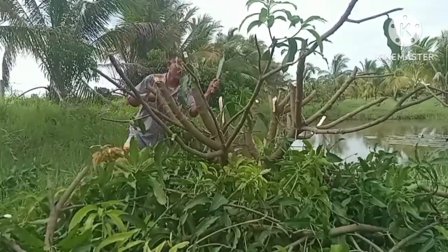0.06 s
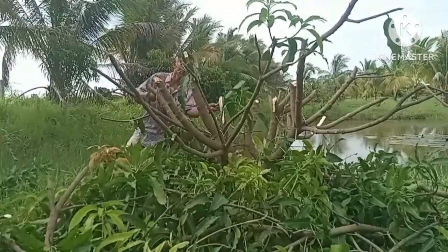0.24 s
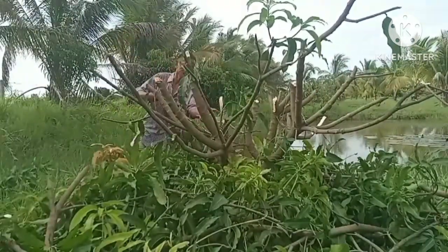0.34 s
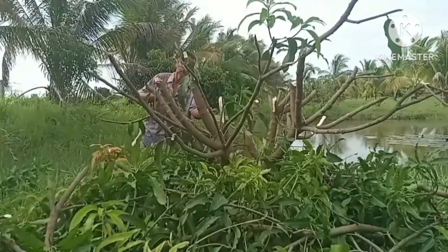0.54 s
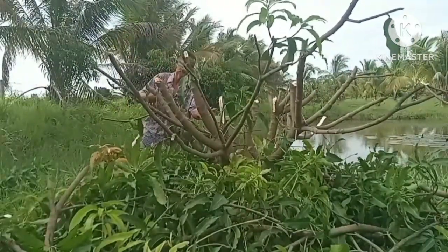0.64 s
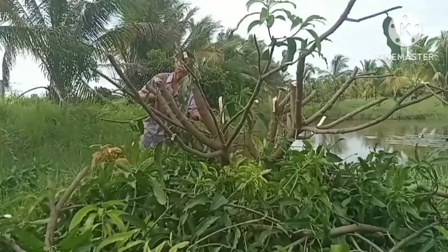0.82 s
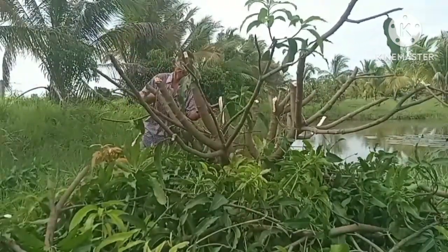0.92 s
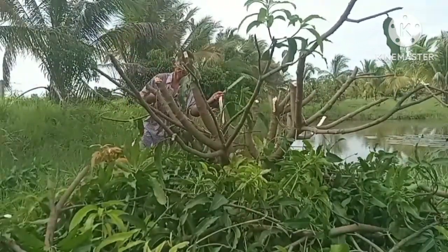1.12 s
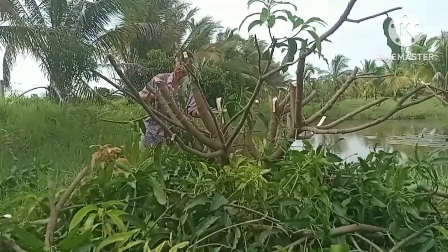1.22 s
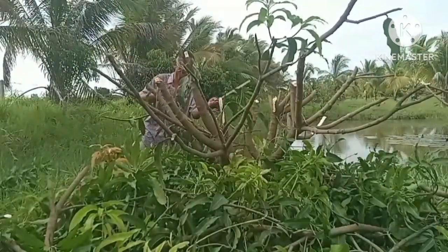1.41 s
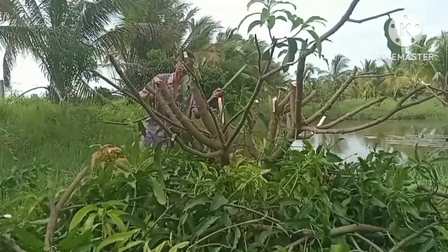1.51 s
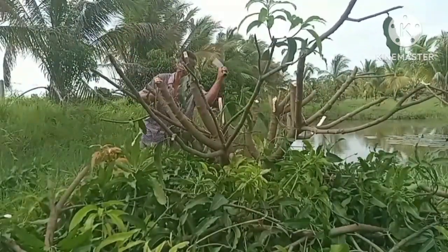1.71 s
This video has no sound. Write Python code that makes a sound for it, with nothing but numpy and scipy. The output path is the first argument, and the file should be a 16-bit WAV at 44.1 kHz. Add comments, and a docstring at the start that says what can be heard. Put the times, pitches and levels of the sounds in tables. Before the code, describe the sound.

A machete chops twice into leafy tree branches, with twigs snapping and leaves rustling outdoors

```python
"""A machete cuts twice into the branches of a leafy tree, a few metres away in an open field.
Each bite is a burst of random fibre fractures, with damped wood modes, hollow thuds and a low shudder.
Leaves rip and twigs snap as filtered clicks; foliage rustles as dense clicks; knocking sticks ring in modes.
Filtered noise gives a faint hiss and rumble, and a noise-driven resonance gives a far-off tone."""
import sys
import numpy as np
from scipy import signal
from scipy.fft import rfft, irfft, next_fast_len
from scipy.io import wavfile

SR = 44100
rng = np.random.default_rng(int(sys.argv[2]) if len(sys.argv) > 2 else 0)


def dump(signal):
    """Clip the signal to [-1, 1] and save it as 16-bit WAV at the path in sys.argv[1]."""
    limited = np.clip(np.atleast_2d(signal).T, -1, 1)
    pcm = np.round(limited * 32767).astype(np.int16)
    wavfile.write(sys.argv[1], SR, pcm)


N = 77175
T = np.arange(N) / SR   # time in s

# blade bites: start_s, level_db, splitting_s (hold before release)
CHOPS = [(0.2668, -15, .0068), (1.2297, -12, .0062)]
# spectrum of the splitting fibres, one list for each cut: frequency_hz, level_db
CUT_COLOURS = [
    [(30, -7), (110, 2.5), (260, -1), (450, 0.5), (680, -5), (850, -5), (1060, -2), (1400, -7), (2200, -6),
     (4000, -4), (7200, 2.5), (8600, -13.5), (11000, -13), (14500, -27), (16000, -45)],
    [(30, -40), (120, -15.5), (350, -2), (550, 3.5), (760, -1), (1100, -10), (1400, -7), (1900, -2),
     (2400, -8), (3300, -6.5), (4400, -8.5), (6500, -5.5), (7600, -5.5), (9000, -20.5), (14500, -26),
     (16000, -38)],
]
SPLIT_RELEASE_S, FIBRES_PER_S = 0.0024, 3200
# modes of each struck branch: pitch_hz, level_db (relative to its bite and WOOD_DB), t60_s
BRANCH_MODES = [
    [(1052, -9.5, 0.025), (1800, -11.5, 0.045), (2230, -5, 0.023), (2740, -14, 0.053), (3354, -11, 0.035),
     (3850, -12.5, 0.032), (4100, -20, 0.04), (5660, -29, 0.037)],
    [(923, -17.5, 0.063), (1102, -27.5, 0.12), (1630, -26, 0.049), (1980, -22, 0.077), (2840, -27, 0.04),
     (3340, -5, 0.02), (6260, -7, 0.019), (6560, -6.5, 0.022)],
]
WOOD_DB = 9
# hollow knocks as the branch takes the blade and springs back: start_s, pitch_hz, level_db, t60_s
THUDS = [(0.2690, 228, -13, 0.021), (0.2778, 256, -10, 0.018), (1.23, 308, -13, 0.022),
         (1.237, 383, -4, 0.027), (1.2510, 322, -24.5, 0.073)]
THUD_RISE_S = 0.0026
# tremble of the tree after each cut: level_db, hold_s, decay_s, spectrum (frequency_hz, level_db)
SHUDDERS = [(-35.5, 0.028, 0.051, [(35, -35), (75, -6.5), (100, 1), (130, -3.5), (190, -4), (300, -10.5),
            (600, -14), (2000, -67)]), (-36.5, 0.052, 0.021, [(35, -22), (75, -7), (105, 4), (180, -12.5),
            (300, 1.5), (420, 3.5), (600, -10), (2000, -81)])]

# leaves torn or swept aside: start_s, level_db, hold_s, treble_tilt_db_per_octave
SWIPES = [(0.2291, -24, 0.0029, 3), (0.237, -15.5, 0.02, 2.5), (0.281, -30, 0.0057, 23),
          (0.336, -26.5, 0.012, 10), (0.354, -21.5, 0.013, -1.5), (0.397, -31.5, 0.0082, -3),
          (0.945, -36.5, 0.025, 1), (1.182, -25, 0.013, 0), (1.323, -31.5, 0.012, -9),
          (1.422, -26.5, 0.0075, 5)]
# spectrum of tearing leaves before the tilt: frequency_hz, level_db
SWIPE_COLOUR = [(40, -50), (290, -5), (520, -14), (950, -13.5), (1300, -6.5), (2200, -6), (3200, -8.5),
                (4800, -12), (6700, 1.5), (7800, -12.5), (8800, -17.5), (11000, -23), (14400, -34),
                (16000, -64)]
TEARS_PER_S, SWIPE_RELEASE_S = 4500, 0.0049
# twigs snapping: start_s, level_db, treble_tilt_db_per_octave
SNAPS = [(0.239, -22.5, 5), (0.256, -17, 2), (0.3378, -26, -3), (0.4425, -24, 12), (0.465, -28, -4),
         (0.4945, -32, -1.5), (0.5095, -31, 1.5), (0.6452, -36, 4), (.677, -36.5, 11), (0.6912, -31.5, 33),
         (0.7305, -36, 10), (0.9571, -31.5, -3.5), (1.028, -47, 5), (1.0856, -34, 7.5), (1.1698, -20.5, 3),
         (1.3972, -22.5, 2.5), (1.4142, -18, -4), (1.4282, -18, -3.5), (1.5886, -23.5, 6.5)]
# spectrum of a snap before the tilt: frequency_hz, level_db
SNAP_COLOUR = [(40, -65), (330, -4), (560, -8), (1100, -8), (2000, -0.5), (3000, 0), (4200, 1),
               (5400, -6.5), (6600, 9), (7800, -15), (9000, -26.5), (11000, -31), (14200, -39),
               (16000, -50)]
SNAP_HOLD_S, SNAP_RELEASE_S, SPLINTERS_PER_S = 0.00023, 0.0046, 4500
FIRST_CRACK_DB = 17.5   # gain of the opening click
# swaying sticks knocking together: start_s, level_db, pitch_ratio
KNOCKS = [(1.3215, -24.5, 1.03), (1.4288, -31.5, 0.66), (1.53, -45, 1.6), (1.542, -43, 1.15),
          (1.599, -50, 0.87), (1.617, -41.5, 0.97), (1.627, -39, 1.02), (1.68, -37.5, 0.93)]
# modes of such a stick: pitch_hz (before the ratio), level_db, t60_s
STICK_MODES = [(1063, -14, 0.04), (1813, 2, 0.03), (2280, -11, 0.021), (3296, -4.5, 0.045),
               (3600, -12, 0.024)]
CHATTER_DB, CHATTER_DECAY_S, CHATTER_TOUCHES_PER_S = -3.5, 0.0067, 3100

# level curves of the shaking foliage, at the start and around each cut: time_s, level_db
SHAKES = [
    [(0, -47), (.03, -49.5), (.1, -61)],
    [(.23, -31), (.29, -32.5), (.33, -28), (.38, -29.5), (.42, -32.5), (.48, -38.5), (.55, -35),
     (.59, -47.5), (.66, -45.5), (.745, -42), (.8, -51.5), (.865, -50.5), (.9, -53)],
    [(1.225, -75), (1.24, -38), (1.28, -33.5), (1.38, -35.5), (1.45, -38.5), (1.51, -45.5), (1.61, -43),
     (1.69, -48), (1.75, -62)],
]
# one tilt for each shake: treble_tilt_db_per_octave
SHAKE_TILTS = [-6, -0.5, -1]
# spectrum of leaf touches before the tilt: frequency_hz, level_db
LEAF_COLOUR = [(120, -23.5), (220, -15.5), (400, -14), (540, -12), (1050, -7.5), (1400, -6.5), (1900, -4),
               (3200, -1), (4700, -6), (6700, 0), (7600, -8), (8600, -17.5), (11500, -28), (14200, -36),
               (16000, -34)]
LEAF_TOUCHES_PER_S, LEAF_SPREAD_DB, LEAF_DIFFUSE_DB = 2000, 3, 4.5
# centres of the bands that swell and fade separately: frequency_hz
PATCH_BANDS = [700, 1100, 1600, 2300, 3300, 4700, 6500]
PATCH_SWELL_DB, PATCH_STEP_S = 5.5, 0.016
TILT_FROM_HZ, TILT_TO_HZ = 1900, 7400   # a treble tilt acts between these and is level beyond

# spectrum of the field hiss: frequency_hz, level_db
AIR_COLOUR = [(100, -4), (250, -13.5), (400, -11), (600, -12), (1400, -9), (2500, -8), (4200, -14),
              (5300, -14.5), (6400, -4), (7300, -11), (8200, -30), (10500, -28), (11700, -19), (12700, -38),
              (14300, -30), (15500, -58)]
AIR_DB, AIR_RIGHT_DB = -51, -5
# spectrum of the moving-air rumble: frequency_hz, level_db
RUMBLE_COLOUR = [(20, -11), (45, 2), (70, 7.5), (105, 6), (150, -6.5), (300, -40), (1000, -52)]
# level curve of the rumble: time_s, level_db
RUMBLE_LEVEL = [(0, -66), (.1, -53.5), (.2, -51), (.38, -54), (.5, -68), (.575, -48.5), (.635, -56.5),
                (.7, -48.5), (.785, -56), (.85, -48), (.9, -58.5), (1.4, -61), (1.75, -61)]
# level curve of the far-off tone: time_s, level_db
FAR_TONE_LEVEL = [(0, -85), (.6, -75), (.655, -60), (.735, -49.5), (.8, -58.5), (.84, -74), (1.06, -67),
                  (1.75, -63)]
FAR_TONE_HZ, FAR_TONE_T60_S = 423, 0.51

# the left microphone hears later, the right one softer
LEFT_LAG_S, RIGHT_DB, BASS_RIGHT_DB = 0.0009607, -6, -4
# tone colour of the right microphone: frequency_hz, level_db
RIGHT_COLOUR = [(100, 0.5), (400, 2), (1000, 2), (2200, -1.4), (4500, 3.5), (7000, -3), (9000, 5.5),
                (14000, 1)]
SCATTER_DB, SCATTER_DECAY_S, SCATTER_FROM_HZ = 5, 0.0016, 1210
ECHO_DB, ECHO_DECAY_S, ECHO_FROM_HZ = -14, 0.042, 230
LOW_CUT_HZ, CUTOFF_HZ, PEAK_LIMIT = 61, 16000, 0.8


def from_db(db):
    """Logarithmic level: 20 decibels make a tenfold amplitude."""
    return 10 ** (np.asarray(db) / 20)


def rms_one(x):
    """Normalisation: the root mean square becomes one."""
    return x / np.sqrt(np.mean(x ** 2) + 1e-20)


def level_curve(points):
    """Envelope: level is linear in decibels between points and held beyond them."""
    return from_db(np.interp(T, *np.transpose(points)))


def coloured(x, points, tilt_db=0):
    """Minimum-phase filtering: a folded cepstrum gives a causal response; the RMS level is kept."""
    size = 2 * next_fast_len(N)
    octave = np.log2(np.maximum(np.arange(size // 2 + 1) * SR / size, 1))
    hz, db = np.transpose(points)
    tilt = tilt_db * np.clip(octave, np.log2(TILT_FROM_HZ), np.log2(TILT_TO_HZ))
    curve = np.interp(octave, np.log2(hz), db) + tilt
    cepstrum = irfft(np.log(from_db(curve - curve.max())))
    # fold negative times onto positive ones
    cepstrum[1:size // 2] *= 2
    cepstrum[size // 2 + 1:] = 0
    filtered = irfft(rfft(x, size) * np.exp(rfft(cepstrum)))[..., :N]
    return rms_one(filtered) * np.sqrt(np.mean(x ** 2))


def grains(per_s, spread_db):
    """Random impulse process: independent clicks of either sign and uneven size."""
    sizes = from_db(spread_db * np.minimum(rng.exponential(1, N), 4))
    signs = rng.choice([-1, 1], N)
    return rms_one(sizes * signs * (rng.random(N) < per_s / SR))


def burst(s, hold_s, release_s, per_s, spread_db):
    """Fracture cascade: tiny breaks begin at once, hold and die exponentially."""
    shape = (T >= s) * np.exp(-np.maximum(T - s - hold_s, 0) / release_s)
    return rms_one(shape * grains(per_s, spread_db)) * np.sqrt(np.mean(shape ** 2))


def impulse(s):
    """Ideal impact: all the force falls in one sample."""
    return np.arange(N) == int(s * SR)


def ring(x, hz, t60):
    """Damped resonance: a pole pair loses 60 dB in its t60."""
    r, w = from_db(-60 / (t60 * SR)), 2 * np.pi * hz / SR
    # the tiny offset keeps the filter from slowing on silence
    return signal.lfilter([0, np.sin(w)], [1, -2 * r * np.cos(w), r * r], x + 1e-18)


def cuts():
    """Brittle fracture: wood fibres split in a dense cascade at each bite."""
    out = 0
    for (s, db, hold_s), colour in zip(CHOPS, CUT_COLOURS):
        splitting = burst(s, hold_s, SPLIT_RELEASE_S, FIBRES_PER_S, spread_db=4.0)
        out = out + from_db(db) * coloured(splitting, colour)
    return out


def branches():
    """Modal vibration: impulses early in each bite excite the damped modes of its branch."""
    out = 0
    for (s, db, splitting_s), modes in zip(CHOPS, BRANCH_MODES):
        for hz, mode_db, t60 in modes:
            blow = impulse(s + splitting_s * rng.random() / 2)
            out = out + from_db(db + WOOD_DB + mode_db) * ring(blow, hz, t60)
    return out


def thuds():
    """Damped oscillation: each hollow knock is a softly rising, exponentially dying sine."""
    out = 0
    for s, hz, db, t60 in THUDS:
        age = np.maximum(T - s, 0)
        decay = np.exp(-np.log(1000) * age / t60)
        rise = 1 - np.exp(-(age / THUD_RISE_S) ** 2)
        out = out + from_db(db) * decay * rise * np.sin(2 * np.pi * hz * age)
    return out


def shudders():
    """Random low-frequency vibration: a low-coloured burst makes the tree tremble after each cut."""
    out = 0
    for (s, *_), (db, hold_s, decay_s, colour) in zip(CHOPS, SHUDDERS):
        tremble = burst(s, hold_s, decay_s, FIBRES_PER_S, spread_db=-8.5)
        out = out + from_db(db) * coloured(tremble, colour)
    return out


def swipes():
    """Tearing: a leaf gives way in many small ruptures, heard as a short rip."""
    out = 0
    for s, db, hold_s, tilt in SWIPES:
        rip = burst(s, hold_s, SWIPE_RELEASE_S, TEARS_PER_S, spread_db=-0.5)
        out = out + from_db(db) * coloured(rip, SWIPE_COLOUR, tilt)
    return out


def snaps():
    """Sudden stress release: a twig gives one sharp crack and a few splinters."""
    out = 0
    for s, db, tilt in SNAPS:
        crack = from_db(FIRST_CRACK_DB) * impulse(s)
        splinters = burst(s, SNAP_HOLD_S, SNAP_RELEASE_S, SPLINTERS_PER_S, spread_db=4.0)
        out = out + from_db(db) * coloured(crack + splinters, SNAP_COLOUR, tilt)
    return out


def knocks():
    """Impact excitation: a blow and its brief chatter drive the modes of a stick."""
    out = 0
    for s, db, pitch in KNOCKS:
        chatter = burst(s, 0, CHATTER_DECAY_S, CHATTER_TOUCHES_PER_S, spread_db=-1.5)
        touch = impulse(s) + from_db(CHATTER_DB) * chatter / np.linalg.norm(chatter)
        for hz, mode_db, t60 in STICK_MODES:
            out = out + from_db(db + mode_db) * ring(touch, hz * pitch, t60)
    return out


def patchy(x):
    """Independent band modulation: each band swells and fades on its own."""
    knots = np.arange(0, T[-1] + PATCH_STEP_S, PATCH_STEP_S)
    # one row per band, with more columns than there are knots
    swells = np.clip(rng.standard_normal((len(PATCH_BANDS), 400)), -2, 2)[:, :len(knots)]
    out = x
    for hz, swell in zip(PATCH_BANDS, swells):
        sos = signal.butter(2, [hz / 1.22, hz * 1.22], "band", fs=SR, output="sos")
        gain = from_db(PATCH_SWELL_DB * np.interp(T, knots, swell))
        out = out + signal.sosfilt(sos, x) * (gain - 1)
    return rms_one(out)


def foliage():
    """Superposed random contacts: leaf touches arrive partly direct, partly from all around."""
    direct, left, right = [patchy(grains(LEAF_TOUCHES_PER_S, LEAF_SPREAD_DB)) for path in range(3)]
    diffuse = from_db(LEAF_DIFFUSE_DB)
    around = np.array([left, from_db(RIGHT_DB) * right])
    touches = (pair(direct, RIGHT_DB) + diffuse * around) / np.hypot(1, diffuse)
    out = 0
    for points, tilt in zip(SHAKES, SHAKE_TILTS):
        level = from_db(np.interp(T, *np.transpose(points), left=-120, right=-120))
        out = out + level * coloured(touches, LEAF_COLOUR, tilt)
    return out


def outdoors():
    """Filtered noise: field hiss, a low rumble of moving air and a faint far-off resonant tone."""
    sides = np.array([patchy(coloured(rng.standard_normal(N), AIR_COLOUR)) for side in "LR"])
    hiss = from_db(AIR_DB) * sides * from_db([[0], [AIR_RIGHT_DB]])
    rumble = level_curve(RUMBLE_LEVEL) * coloured(rng.standard_normal(N), RUMBLE_COLOUR)
    resonance = rms_one(ring(rng.standard_normal(N), FAR_TONE_HZ, FAR_TONE_T60_S))
    tone = level_curve(FAR_TONE_LEVEL) * resonance
    return hiss + pair(rumble + tone, BASS_RIGHT_DB)


def delayed(x):
    """Propagation delay: the wave reaches the left microphone after a lag."""
    return np.interp(T - LEFT_LAG_S, T, x, left=0)


def pair(x, right_db):
    """Interchannel time and level difference: left is later, right is scaled."""
    return np.array([delayed(x), from_db(right_db) * x])


def scattered(x, decay_s, from_hz):
    """Multiple scattering: plants return dying reflections, different on each side; bass passes by."""
    spectrum = rfft(rng.standard_normal((2, N)) * np.exp(-T / decay_s))
    even_paths = irfft(spectrum / np.abs(spectrum), N)   # flat magnitude, random phase
    paths = signal.sosfilt(signal.butter(2, from_hz, "high", fs=SR, output="sos"), even_paths)
    left, right = signal.fftconvolve(x[None], paths, axes=1)[:, :N]
    return np.array([delayed(left), from_db(RIGHT_DB) * right])


def scene():
    """Linear superposition: blows, leaves and background add at the two microphones."""
    cracks = cuts() + swipes() + snaps()
    wood = branches() + knocks()
    scatter = from_db(SCATTER_DB)
    reflections = scattered(cracks, SCATTER_DECAY_S, SCATTER_FROM_HZ)
    near = (pair(cracks, RIGHT_DB) + scatter * reflections) / np.hypot(1, scatter)
    echo = from_db(ECHO_DB) * scattered(cracks + wood, ECHO_DECAY_S, ECHO_FROM_HZ)
    low = thuds() + shudders()
    tree = near + echo + pair(wood, RIGHT_DB) + pair(low, BASS_RIGHT_DB)
    left, right = tree + foliage() + outdoors()
    return np.array([left, coloured(right, RIGHT_COLOUR)])


def record(dry):
    """Band limiting and clipping: deep bass is thinned, high peaks are clipped, the top is cut."""
    thinned = signal.sosfilt(signal.butter(2, LOW_CUT_HZ, "high", fs=SR, output="sos"), dry)
    clipped = np.clip(thinned, -PEAK_LIMIT, PEAK_LIMIT)
    return signal.sosfilt(signal.cheby2(12, 60, CUTOFF_HZ, fs=SR, output="sos"), clipped)


dry = scene()
out = record(dry)
dump(out)
```